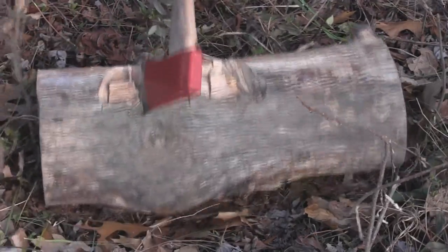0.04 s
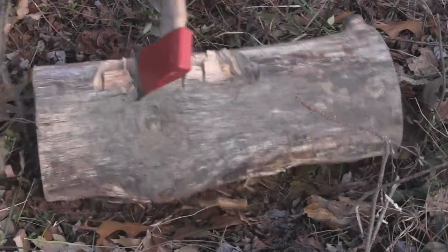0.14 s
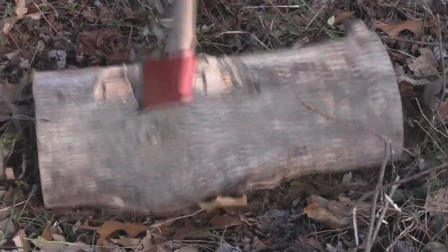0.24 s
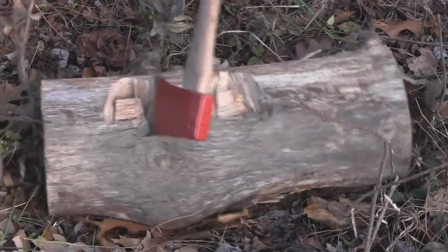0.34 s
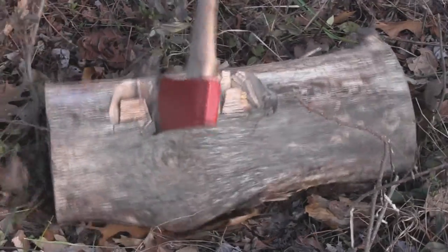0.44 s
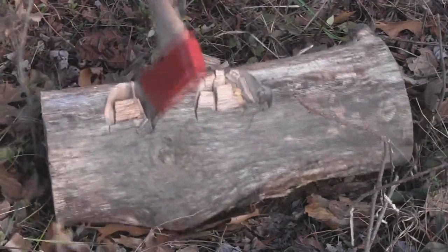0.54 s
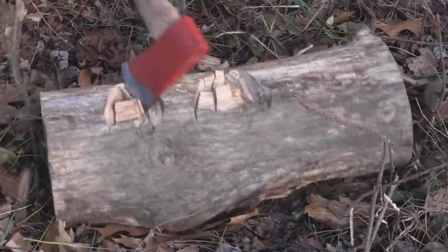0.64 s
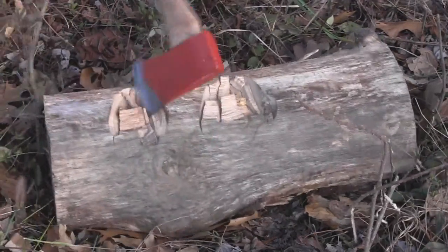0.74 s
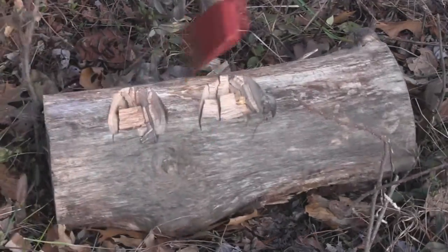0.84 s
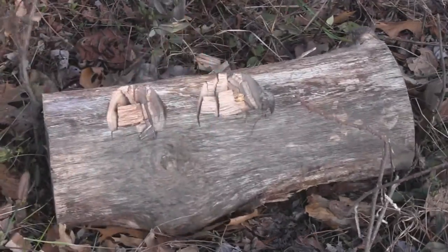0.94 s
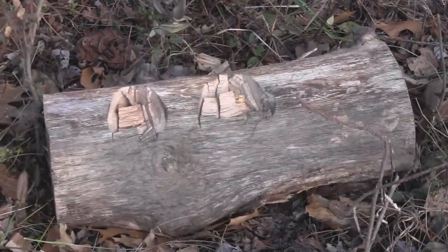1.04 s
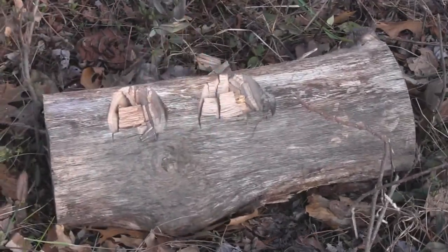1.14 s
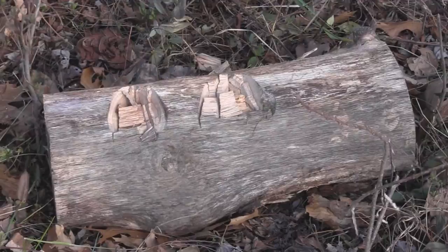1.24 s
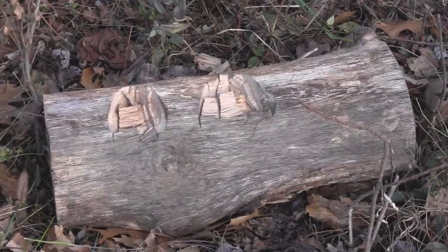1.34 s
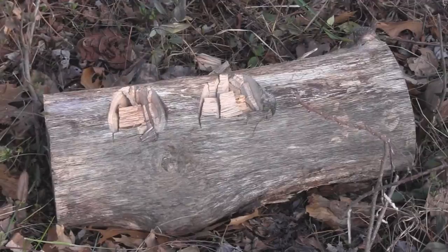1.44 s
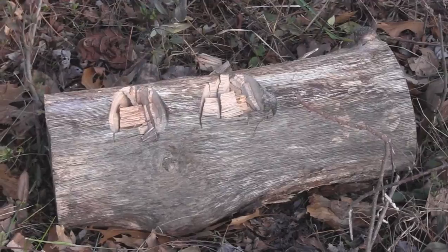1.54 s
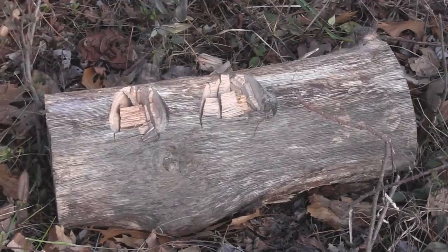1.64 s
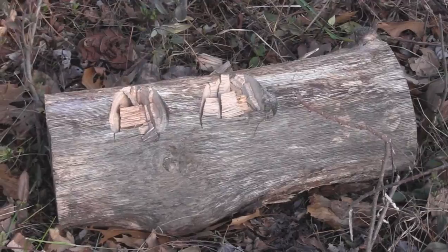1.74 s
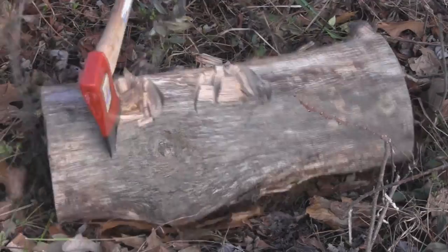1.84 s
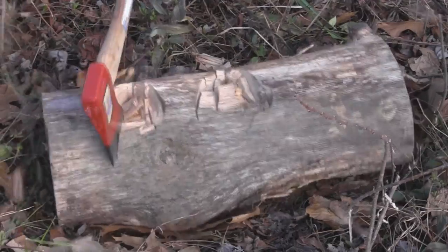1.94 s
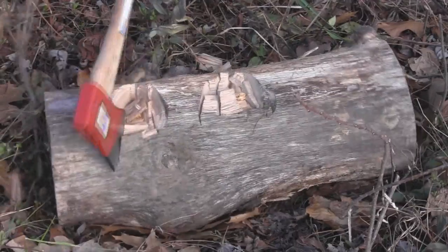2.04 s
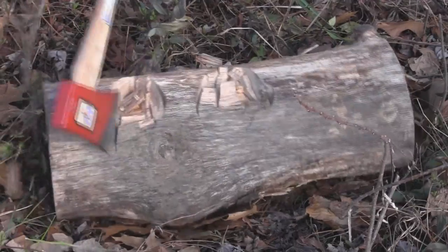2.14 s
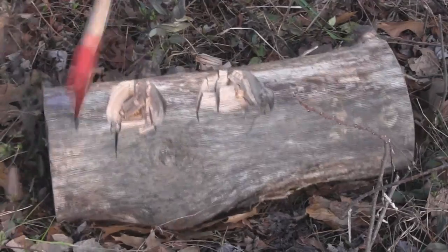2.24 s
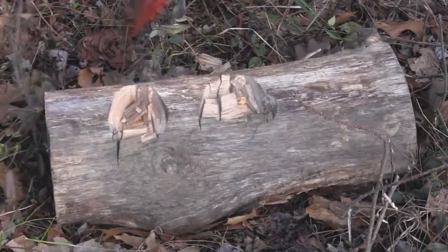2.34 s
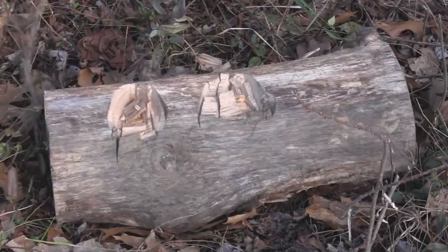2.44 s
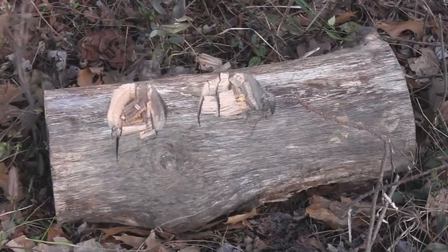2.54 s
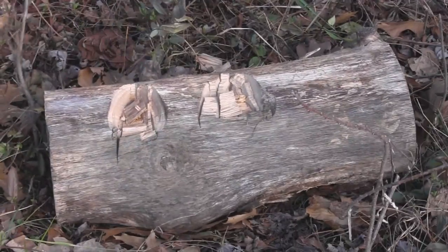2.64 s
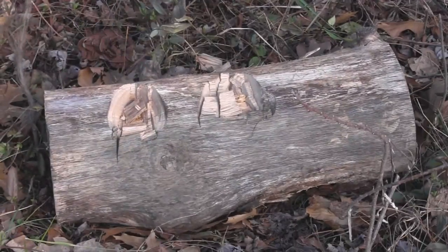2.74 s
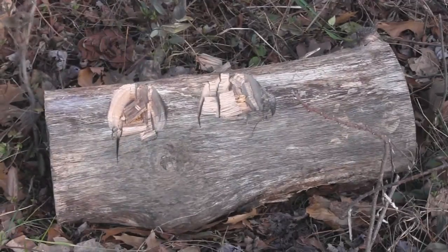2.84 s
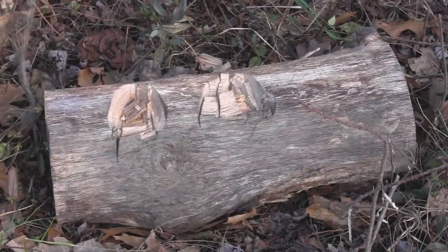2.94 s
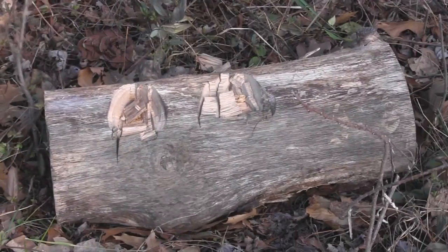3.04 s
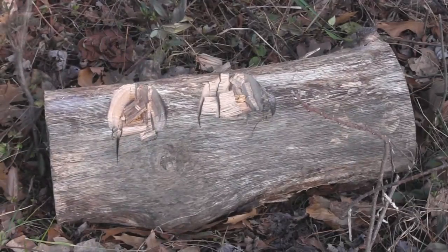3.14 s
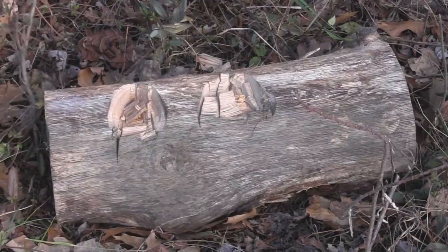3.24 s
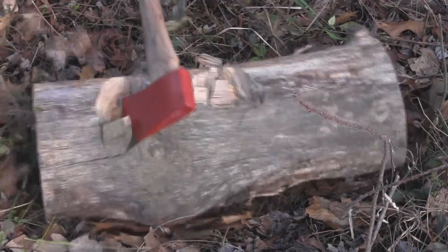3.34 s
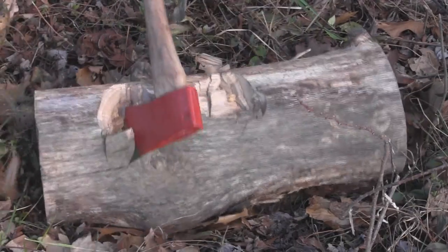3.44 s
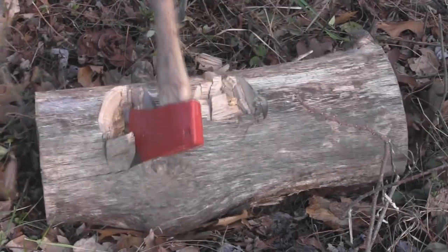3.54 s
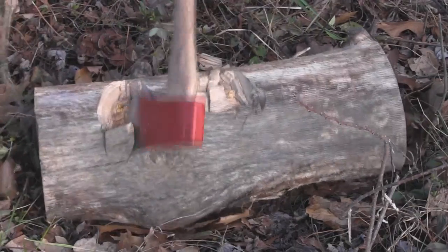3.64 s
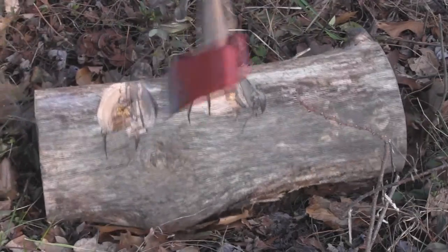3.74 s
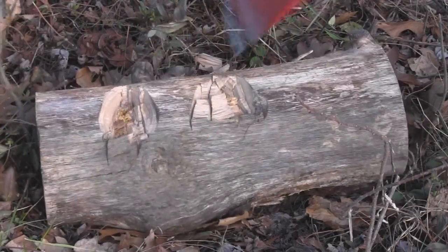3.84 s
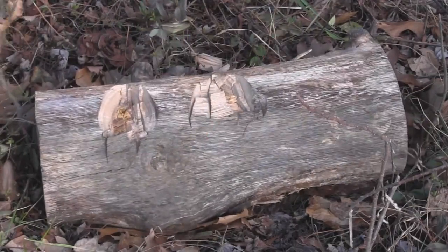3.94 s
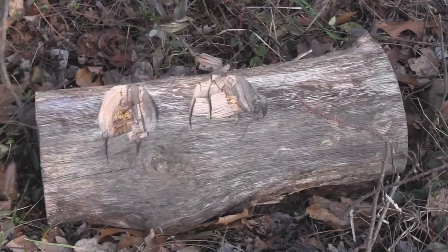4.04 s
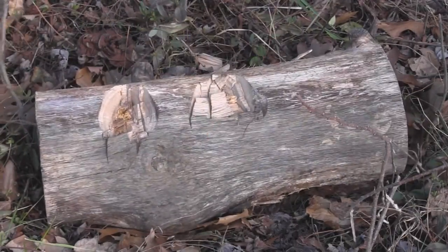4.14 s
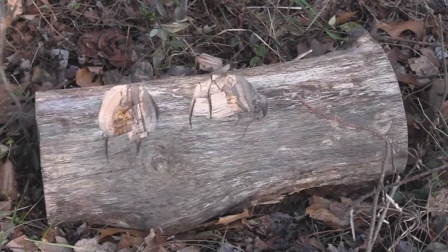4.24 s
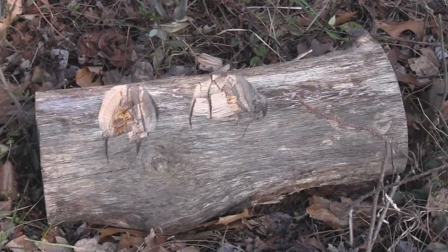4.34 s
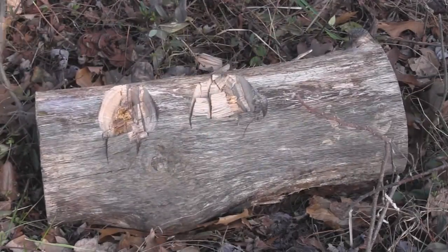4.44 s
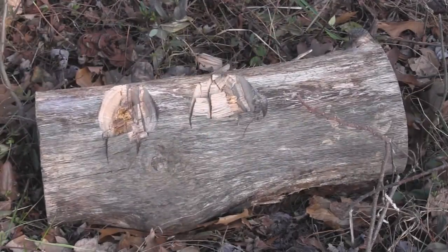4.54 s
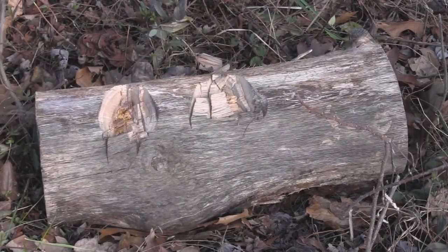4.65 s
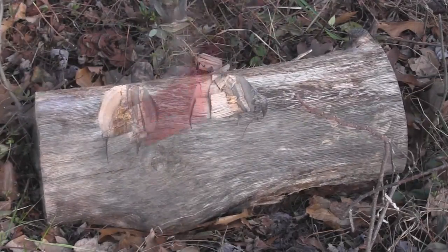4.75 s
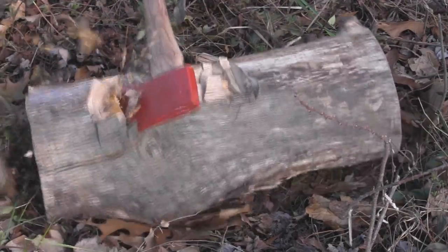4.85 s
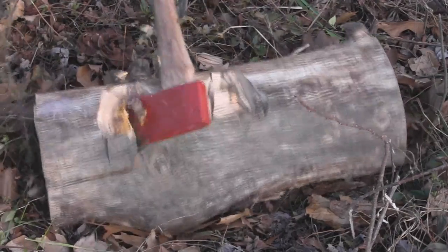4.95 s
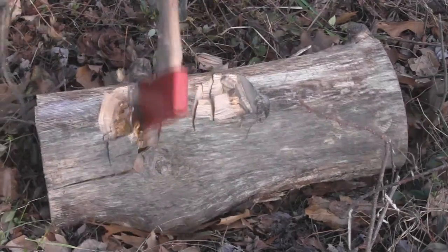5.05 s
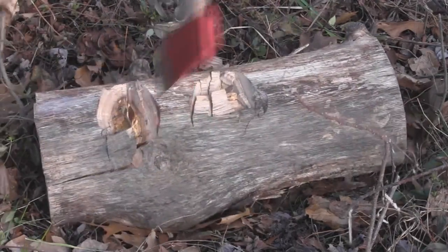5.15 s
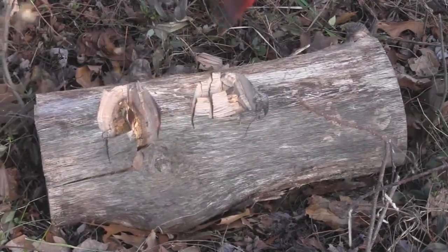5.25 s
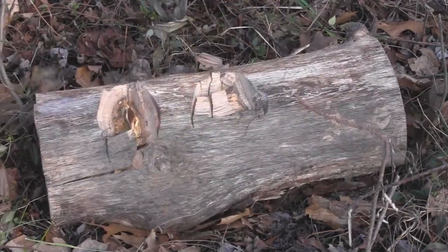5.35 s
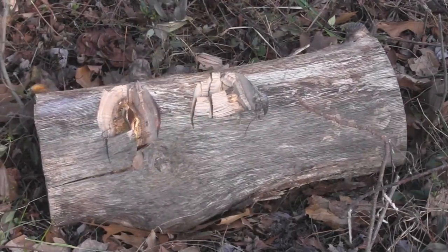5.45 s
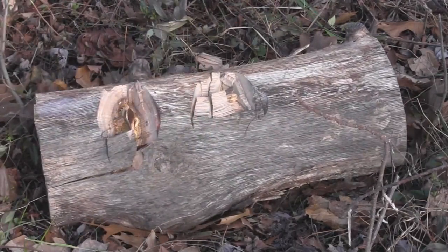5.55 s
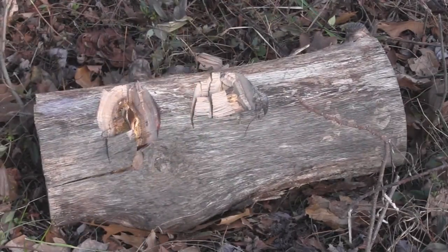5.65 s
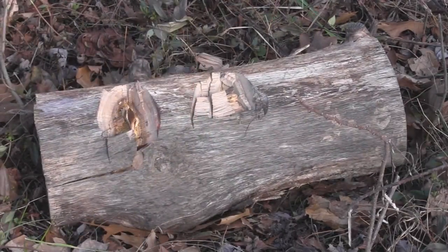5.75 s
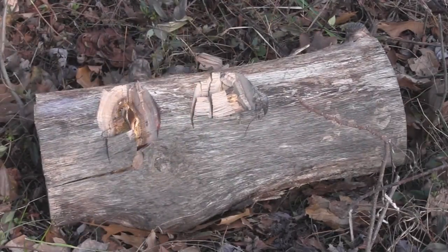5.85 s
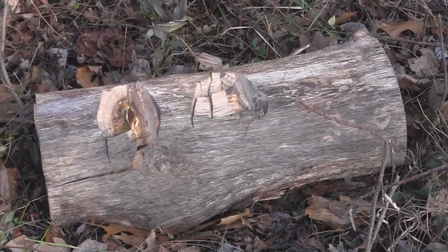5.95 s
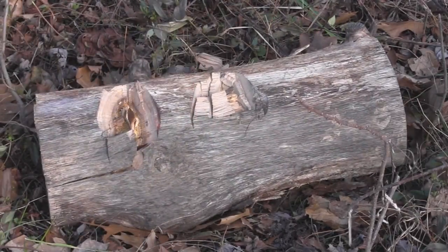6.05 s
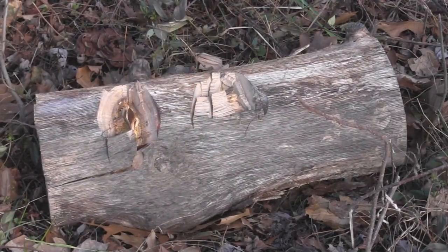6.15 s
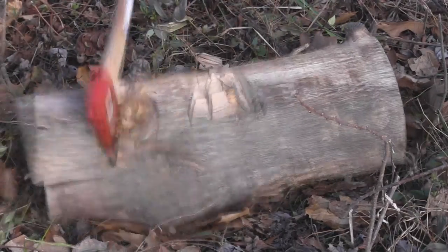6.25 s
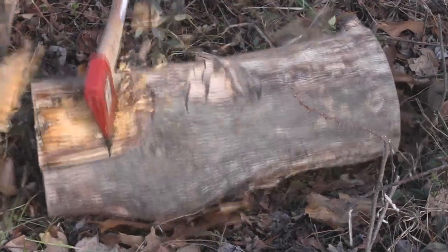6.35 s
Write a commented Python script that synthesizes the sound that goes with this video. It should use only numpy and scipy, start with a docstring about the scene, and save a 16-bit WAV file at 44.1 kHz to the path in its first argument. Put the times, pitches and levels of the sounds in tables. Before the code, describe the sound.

Dry leaves rustle and twigs snap, then an axe bites into a dry log three times, about a second and a half apart. Each blow is a loud, sharp, slightly clipped crack with splintering and a dull echo from the woods. A hand slides briefly along the handle before the second blow. Soft low bumps and light wind rumble on the close stereo microphone continue over a distant hush.

```python
"""Chopping a log in the woods

An axe bites three times into a dry log, close to a small stereo microphone. Each blow rings the wood
and the steel head and tears fibres; trunks and a slope throw back dull echoes. Over a distant hush,
gusts rumble on the microphone, leaves rustle and snap, the log and feet bump, and a hand slides along
the handle. The recorder clips each blow and briefly turns itself down after it."""
import sys
import numpy as np
from scipy import signal
from scipy.fft import rfft, irfft
from scipy.io import wavfile
from scipy.ndimage import uniform_filter1d

SR = 44100
rng = np.random.default_rng(int(sys.argv[2]) if len(sys.argv) > 2 else 0)


def materialize(psi):
    """Save the field psi as 16-bit PCM at rate SR to the path in sys.argv[1].

    A 1-D psi becomes a single channel; in a 2-D psi each row is a channel.
    """
    bounded = np.clip(np.atleast_2d(psi).T, -1, 1)
    quanta = np.round(bounded * 32767).astype(np.int16)
    wavfile.write(sys.argv[1], SR, quanta)


N = 282681

# The tone of each noisy sound. Each row: frequency in Hz, relative strength in dB.
HUSH_TONE = [(15, -56), (32, -28), (120, -6.5), (425, 1.5), (572, -2), (749, -3.5), (1780, -10.5),
             (2330, -11), (3780, -13), (8050, -15.5), (12100, -21.5), (15800, -28)]
WIND_TONE = [(15, -58), (25, -28), (38, -29), (118, 0), (134, 1.5), (281, -3), (317, -6), (408, -11),
             (518, -18), (600, -17), (780, -23), (1320, -120)]
LEAF_TONE = [(240, -21), (400, 2.5), (614, -8.5), (705, -6), (1240, -5), (1610, -9.5), (2220, -8),
             (6280, -13.5), (11600, -21), (15500, -31)]
SPLINTER_TONE = [(470, -17), (800, -2), (2410, -22), (6270, -20), (7010, -27.5), (8230, -28),
                 (15500, -38.5)]
HAND_TONE = [(710, -22), (1200, -15), (1650, -13.5), (2460, -1), (2950, -10), (3390, -5), (5370, -6),
             (9890, -9.5), (15500, -22)]
# How loud the gusts and the sliding hand are. Each row: time in seconds, level in dB.
WIND_LEVELS = [(0, -32), (.15, -42.5), (.34, -43.5), (.4, -34.5), (.53, -35), (.77, -45.5), (1.11, -37.5),
               (1.27, -60.5), (1.5, -49.5), (1.63, -72), (2.89, -60), (3.03, -34), (3.15, -51), (3.34, -31),
               (3.6, -41.5), (3.68, -33.5), (3.93, -35.5), (4.02, -42.5), (4.35, -50), (4.4, -35.5),
               (4.7, -50), (5.09, -44), (5.24, -34.5), (5.39, -34.5), (5.79, -41.5), (5.84, -46),
               (6.41, -49.5)]
HAND_LEVELS = [(2.93, -45.5), (2.998, -27.5), (3.056, -24), (3.09, -27), (3.102, -36), (3.13, -43)]
# Stirs of the fallen leaves. Each row: peak time in seconds, peak level in dB,
# seconds to rise by 10 dB, seconds to fall by 10 dB.
LEAF_STIRS = [(.08, -32, 0.052, 0.098), (.34, -34.5, 0.25, 0.12), (.47, -34, 0.056, .12),
              (.66, -32.5, 0.071, 0.085), (.84, -39, 0.062, 0.23), (1.49, -47, 0.38, 0.045),
              (1.66, -40, .03, 0.053), (1.93, -45, 0.19, 0.57), (2.11, -41, 0.3, 0.062),
              (2.24, -36, 0.047, 0.17), (2.61, -35.5, 0.0093, .05), (2.7, -46, 0.13, 0.43),
              (2.95, -41, 0.069, 0.32), (3.33, -29, .15, 0.065), (3.41, -36.5, .1, 0.052),
              (3.62, -41, 0.16, 0.12), (3.84, -42.5, 0.052, 0.077), (4.07, -38, 0.027, 0.11),
              (4.53, -41.5, 0.09, 0.073), (4.85, -42, 0.23, .1), (5.08, -37.5, 0.17, 0.2),
              (5.28, -41, 0.075, 0.41), (5.57, -36, 0.1, 0.073), (5.67, -37.5, 0.055, 0.033),
              (5.75, -42, 0.057, 0.093), (5.95, -40, 0.013, 0.035), (6.34, -42.5, 0.066, 0.044)]
# Leaves, twigs and falling chips snapping. Each row: start in seconds, level in dB, pitch in Hz,
# left minus right in dB, spray compared with the crack in dB.
TWIG_SNAPS = [(0.047, -28, 4060, -1, -16), (0.0663, -21.5, 5860, -3, -24), (0.1974, -30, 6450, -6, -14),
              (0.3196, -29.5, 11000, 3, -8), (0.3775, -19.5, 1340, -5, -11), (0.5778, -26.5, 2930, -1, -10),
              (0.71, -20.5, 3080, 1, -19), (0.73, -23, 3390, -1, -16), (0.762, -29.5, 12000, 0, -3),
              (0.815, -34.5, 2720, -3, 0), (1.1977, -35, 5530, -1, 1), (2.2172, -18.5, 2470, 4.5, -32),
              (2.2427, -28, 2470, 3, -9), (2.277, -24.5, 4660, -2, -4), (2.383, -35, 3390, 12, -8),
              (2.4454, -34, 3600, 1, -16), (2.6165, -28, 8850, -16, -4), (3.243, -24.5, 3540, 3, -7),
              (3.3442, -26, 9670, 5, -0.5), (4.0602, -20.5, 3180, 6, -12.5), (4.076, -36, 1830, 10, 3.5),
              (4.331, -34, 7300, 4, -15), (4.3474, -23, 10200, 6, -16), (4.6, -35.5, 11100, 7, -3.5),
              (5.3, -34, 2920, 4, -3), (5.3404, -28.5, 4650, 4, -16), (5.3942, -33.5, 2980, 1, -4),
              (5.4873, -29.5, 4620, -7, -4), (5.5197, -30.5, 1950, 4, -20), (5.543, -30, 2200, 1.5, -3.5),
              (5.5884, -25.5, 3470, 4, -10), (5.65, -27.5, 2780, 4, -8), (5.728, -23, 1290, 4, -8),
              (5.8088, -40, 1250, 3, 4), (5.8721, -34, 3090, -1, -7), (5.9484, -25, 2270, 9.5, -6.5),
              (6.2189, -23, 1060, -1, -7)]
# Low bumps, and a ping of the axe head. Each row: start in seconds, level in dB, pitch in Hz,
# fade time in seconds. A fade time is how long a sound takes to drop by 60 dB.
LOW_BUMPS = [(0.092, -19, 132, 0.083), (0.373, -23, 215.5, 0.15), (0.514, -18, 281, 0.065),
             (1.105, -22, 181, 0.051), (2.92, -27, 144, 0.058), (3.294, -26, 111, 0.092),
             (3.434, -13.5, 334, 0.038), (3.477, -10, 60, 0.032), (3.676, -24, 249, 0.073),
             (3.862, -10, 303, 0.035), (4.392, -24, 182, 0.094), (4.942, -31, 45, 0.027),
             (5.149, -21.5, 129, 0.059), (5.3, -21, 222, 0.028), (5.586, -17.5, 115, 0.087)]
STEEL_PINGS = [(0.975, -30.5, 3400, 0.086)]
# Bites of the blade, three or four to a blow. Each row: start in seconds, log level in dB,
# pitch multiplier, extra starting pitch as a fraction, then gains in dB for the log's upper notes,
# the steel and the splinters.
BLADE_BITES = [(1.9705, 12, 0.83, 0.11, -10, 8, 8.5), (1.9731, 9.5, .82, 0.27, -4.5, -8, -2),
               (1.9765, 9, 0.79, 0.025, -15, -26, -10), (1.987, -12, 0.75, 0.051, -15, -30, -8),
               (3.4773, 12, 0.99, 0.053, -4, -22, 8.5), (3.4838, -5, 0.93, 0.058, 0, -25, -12),
               (3.494, -25, 0.68, .05, -6, -30, -31), (4.9413, 13.5, 0.96, 0.236, 2.5, -26, 7),
               (4.9438, 7, 0.83, 0.061, -4, -22, 6), (4.9468, 4, 0.93, 0.044, 2, -20, 4.5),
               (4.9555, -5, 0.64, 0.041, -3, -30, -13)]
# The natural notes of the log, and of the axe head damped by the wood.
# Each row: base pitch in Hz, relative level in dB, fade time in seconds.
LOG_NOTES = [(722, 2.5, 0.025), (868, 9.5, 0.0059), (1169, -2, 0.022), (1419, -2.5, 0.021),
             (1604, -21.5, 0.022), (2120, -6.5, 0.018), (2410, -7.5, 0.011), (2710, 3.5, 0.0068),
             (3318, -12, 0.019)]
STEEL_NOTES = [(4090, 2, 0.011), (4230, -9, 0.01), (6660, -7.5, 0.011)]
# Echoes from nearby surfaces. Each row: delay in seconds, gain in dB.
NEAR_ECHOES = [(.024, -50), (.052, -23.5), (.06, -47), (.075, -51), (.108, -44), (.122, -62), (.132, -17),
               (.139, -41), (.152, -34)]
# Basic stereo width of the noises. "Mid" is what left and right share; "side" is how they differ.
# Each row: frequency in Hz, side compared with mid in dB.
NOISE_WIDTH = [(60, -29), (130, -24.5), (290, -18.5), (640, -11.5), (1410, -5), (3100, -3), (6820, -1.5),
               (15000, 0)]
# Stereo width of the low sounds. Each row: time in seconds, side gain in dB.
LOW_SPREAD = [(0, -46), (.8, -27), (1.5, -17), (2.1, -23), (2.8, -9), (3.0, -8.5), (3.6, -3.5), (4.4, 3.5),
              (6.41, 5)]


def amp(db):
    """Turns decibels into a number to multiply by."""
    return 10 ** (np.asarray(db) / 20)


def normalise(x):
    """Scales a signal to an average power of 1."""
    return x / np.sqrt(np.mean(x ** 2) + 1e-20)


def at_hz(table, hz):
    """Looks up a table at these frequencies, gliding between rows on a musical scale."""
    row_hz, values = np.transpose(table)
    return np.interp(np.log(hz + 1), np.log(row_hz + 1), values)


def at_time(table, t):
    """Looks up a table at these times, gliding between rows."""
    return np.interp(t, *np.transpose(table))


def add(mix, start, sound):
    """Lays a sound into the mix, with its start in seconds."""
    part = mix[..., round(start * SR):][..., :sound.shape[-1]]
    part += sound[..., :part.shape[-1]]


def filtered(x, hz, kind):
    """Keeps the "low" part, the "high" part or a "band" of a sound."""
    return signal.sosfilt(signal.butter(2, hz, kind, fs=SR, output="sos"), x)


def ring(notes, t, pitch_clock):
    """A struck object rings as fading sine waves; a faster pitch_clock raises their pitch."""
    return sum(amp(db - 60 * t / fade) * np.sin(2 * np.pi * hz * pitch_clock) for hz, db, fade in notes)


def noise(tone, size, patchy_db, flicker_db, wide_db, tilt=((0, 0), (9, 0))):
    """Restless stereo noise, built from short frames; tilt adds treble in dB per octave over time."""
    hop = size // 4
    frames, hz = N // hop + 5, np.fft.rfftfreq(size, 1 / SR)
    a, b, c, d, patches = rng.standard_normal((frames, len(hz), 5)).T
    patches = uniform_filter1d(patches, size=size // 64, axis=0)  # smooth across pitch
    patches = normalise(uniform_filter1d(patches, size=12, axis=1))  # and across time
    flicker = np.minimum(rng.exponential(1, frames), 3) - 1
    slope_db = at_time(tilt, np.arange(frames) * hop / SR) * np.log2((hz[:, None] + 50) / 4000)
    shape = amp(at_hz(tone, hz)[:, None] + slope_db)
    shape /= np.sqrt((shape ** 2).mean(0))
    mid = a + 1j * b
    side = (c + 1j * d) * amp(at_hz(NOISE_WIDTH, hz)[:, None] + wide_db)
    spectra = np.array([mid + side, mid - side]) * shape * amp(patchy_db * patches + flicker_db * flicker)
    sound = signal.istft(spectra, nperseg=size, noverlap=size - hop)[1][:, :N]
    return sound / np.sqrt(np.mean(sound.mean(0) ** 2))


def distant_hush():
    """A soft, even noise from far away."""
    return amp(-43.5) * noise(HUSH_TONE, size=1024, patchy_db=0.8, flicker_db=1.5, wide_db=-3)


def wind(t):
    """Gusts push on the microphone's openings and make it rumble."""
    rumble = noise(WIND_TONE, size=1024, patchy_db=2, flicker_db=3.5, wide_db=9.5)
    return amp(at_time(WIND_LEVELS, t)) * rumble


def leaf_crackle():
    """Dry leaves give tiny cracks at random moments, a few of them loud."""
    out, t = np.zeros((2, N)), np.arange(300) / SR
    for hz in np.geomspace(2200, 12500, num=10):
        strength = amp(2.2 * np.minimum(rng.exponential(1, N), 4))
        cracks = strength * (rng.random(N) < 25 / SR)  # about 25 a second
        tick = np.sin(2 * np.pi * hz * t) * np.exp(-t * hz)
        balance = amp(rng.uniform(-3, 5.5) * np.array([[1], [-1]]))
        out += signal.oaconvolve(cracks, tick)[:N] * balance
    return normalise(out)


def rustling_leaves(t):
    """Each stir of the leaves swells and dies away; louder stirs sound brighter."""
    steps = np.arange(0, N / SR + .01, .005)
    power = sum(amp(db - 10 * np.maximum((peak - steps) / rise, (steps - peak) / fall)) ** 2
                for peak, db, rise, fall in LEAF_STIRS)
    level_db = 10 * np.log10(power + 1e-9)
    brightness = np.transpose([steps, 2 + 0.25 * (level_db + 37.5)])
    rustle = noise(LEAF_TONE, size=256, patchy_db=2, flicker_db=3, wide_db=-6.5, tilt=brightness)
    return (rustle + amp(-11) * leaf_crackle()) * amp(np.interp(t, steps, level_db))


def snaps(crack_fade_s=0.02, spray_fade_s=0.064):
    """Each snap is a short crack with a longer spray of dry fragments."""
    out, t = np.zeros((2, N)), np.arange(4096) / SR
    hz = np.fft.rfftfreq(len(t), 1 / SR)
    attack = np.minimum(t / 0.00048, 1)
    for start, db, pitch, pan_db, spray_db in TWIG_SNAPS:
        hiss = rng.standard_normal((4, len(t)))
        hiss = hiss[::2] + 0.17 * np.array([hiss[1::2], -hiss[1::2]])  # left and right nearly alike
        hump = 1 / (1 + ((hz - pitch) / (0.45 * pitch)) ** 2)
        crack_tone = hump * hz / (hz + 800)
        spray_tone = hz / (hz + 3000) / (hz + 3940 + 0.4 * pitch)  # higher snaps spray brighter
        crack = normalise(irfft(rfft(hiss[:, 0]) * crack_tone)) * amp(-60 * t / crack_fade_s)
        spray = normalise(irfft(rfft(hiss[:, 1]) * spray_tone)) * amp(spray_db - 60 * t / spray_fade_s)
        balance = amp([[pan_db / 2], [-pan_db / 2]])
        add(out, start, (crack + spray) * amp(db) * attack * balance)
    return out


def bumps(rise_s=0.0041):
    """Soft, low knocks as the log rocks or feet shift, and a deep thud under two of the blows."""
    out, t = np.zeros(N), np.arange(8192) / SR
    for start, db, hz, fade in LOW_BUMPS:
        notes = [(hz, db, fade), (1.625 * hz, db - 9, 1.6 * fade)]
        add(out, start, ring(notes, t, t) * (1 - np.exp(-t / rise_s)))
    return out


def steel_ping(rise_s=0.002):
    """The axe head grazes something and rings with one high note."""
    out, t = np.zeros(N), np.arange(4096) / SR
    for start, db, hz, fade in STEEL_PINGS:
        add(out, start, ring([(hz, db, fade)], t, t) * np.minimum(t / rise_s, 1))
    return out


def axe_blows(settle_s=0.0034, wood_rise_s=0.0021, contact_rise_s=0.00031):
    """Each bite rings the log and the steel and tears fibres."""
    out, t = np.zeros((2, N)), np.arange(4096) / SR
    tone = amp(at_hz(SPLINTER_TONE, np.fft.rfftfreq(len(t), 1 / SR)))
    for start, log_db, pitch, extra, upper_db, steel_db, splinter_db in BLADE_BITES:
        # Wedged wood starts out stiffer, so its pitch starts high and settles.
        clock = pitch * (t + extra * settle_s * (1 - np.exp(-t / settle_s)))
        wood = ring(LOG_NOTES[:1], t, clock) + amp(upper_db) * ring(LOG_NOTES[1:], t, clock)
        wood *= amp(log_db) * (1 - np.exp(-t / wood_rise_s))
        steel = amp(steel_db) * ring(STEEL_NOTES, t, t)
        mid, side = rng.standard_normal((2, len(t)))
        tearing = normalise(irfft(rfft(mid + 0.22 * np.array([side, -side])) * tone))
        fading = amp(-60 * t / 0.0092) + amp(-16 - 60 * t / 0.074)  # a quick crack and a faint tail
        splinters = amp(splinter_db) * tearing * fading
        add(out, start, (wood + steel + splinters) * (1 - np.exp(-t / contact_rise_s)))
    return filtered(out, 377, "high")  # the log gives off little bass


def far_echoes(axe, rise_s=0.1, fade_s=1.04):
    """Far trunks scatter each blow into many tiny echoes that blend into a dull tail."""
    t = np.arange(SR) / SR
    echoes = rng.choice([-1., 1.], (2, SR)) * (rng.random((2, SR)) < 2000 / SR)
    echoes = echoes + 0.49 * echoes[::-1]  # each side hears some of the other
    echoes *= (1 - np.exp(-(t / rise_s) ** 2)) * amp(-60 * t / fade_s)
    echoes *= amp(-32) / np.linalg.norm(echoes[0])
    dull = filtered(axe, 1660, "low")
    return signal.fftconvolve(dull[None], echoes, axes=1)[:, :N]


def near_echoes(axe, band_hz=(490, 800), blur_s=0.0025):
    """Nearby surfaces send back a few dull slaps, each blurred by rough bark."""
    out, t = np.zeros(N), np.arange(1024) / SR
    blur = np.exp(-t / blur_s) * np.cos(2 * np.pi * np.mean(band_hz) * t)
    slap = signal.oaconvolve(filtered(axe, band_hz, "band"), 2 * blur / (blur_s * SR))[:N]
    for delay, db in NEAR_ECHOES:
        add(out, delay, amp(db) * slap)
    return out


def sliding_hand(t):
    """Skin rubs along the handle with a brief hiss."""
    sliding = (t > HAND_LEVELS[0][0]) & (t < HAND_LEVELS[-1][0])
    rubbing = noise(HAND_TONE, size=256, patchy_db=1.5, flicker_db=-2.5, wide_db=-8.5)
    return sliding * amp(at_time(HAND_LEVELS, t)) * rubbing


def spread_lows(mix, t, below_hz=2090):
    """The low sounds sit in the centre at first and spread out later."""
    mid, side = (mix[0] + mix[1]) / 2, (mix[0] - mix[1]) / 2
    low_side = signal.sosfiltfilt(signal.butter(2, below_hz, fs=SR, output="sos"), side)
    side += low_side * (amp(at_time(LOW_SPREAD, t)) - 1)
    return np.array([mid + side, mid - side])


def scene():
    """Mixes the axe and its echoes with the quieter sounds around it."""
    t = np.arange(N) / SR
    noises = rustling_leaves(t) + sliding_hand(t) + wind(t) + distant_hush()
    axe = axe_blows()
    echoes = far_echoes(axe.mean(0)) + near_echoes(axe.mean(0))
    return spread_lows(noises + snaps() + bumps() + steel_ping() + axe + echoes, t)


def record(dry, threshold_db=-5.5, react_s=0.0023):
    """The recorder turns loud sounds down a moment too late, so their peaks are cut flat (clipped)."""
    power_db = 10 * np.log10(abs(uniform_filter1d((dry ** 2).mean(0), size=200)) + 1e-12)
    recovery_db = 106 * np.arange(N) / SR
    held_db = np.maximum.accumulate(power_db + recovery_db) - recovery_db  # each peak sinks steadily
    excess_db = np.maximum(held_db - threshold_db, 0)
    lag = np.exp(-1 / (react_s * SR))
    cut_db = 0.81 * signal.lfilter([1 - lag], [1, -lag], excess_db)
    clipped = np.clip(dry / amp(cut_db), -.99, .99)
    clipped = filtered(clipped, 35, "high")  # a capacitor blocks the deepest bass
    treble_cut = signal.firwin(1023, 15840, window=("kaiser", 9), fs=SR)
    return signal.oaconvolve(clipped, treble_cut[None], "same")


dry = scene()
out = record(dry)
materialize(out)
```